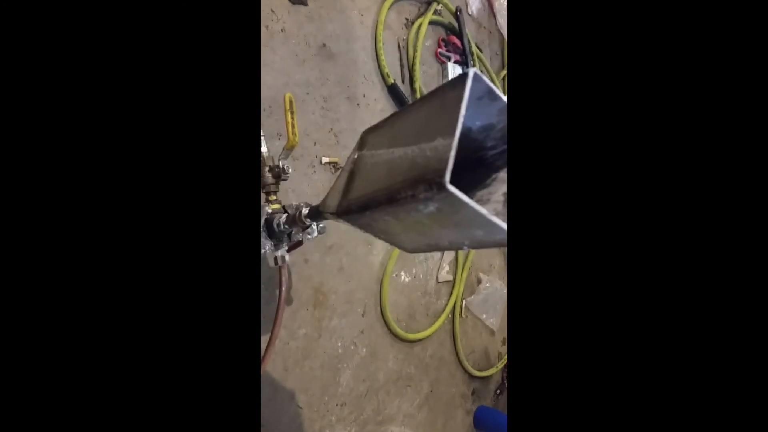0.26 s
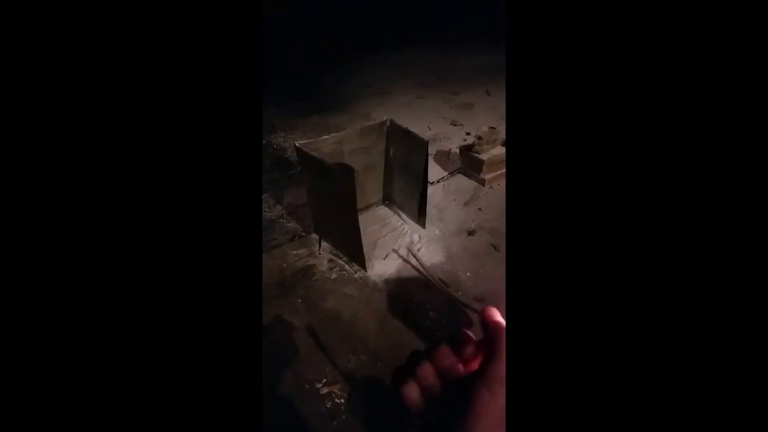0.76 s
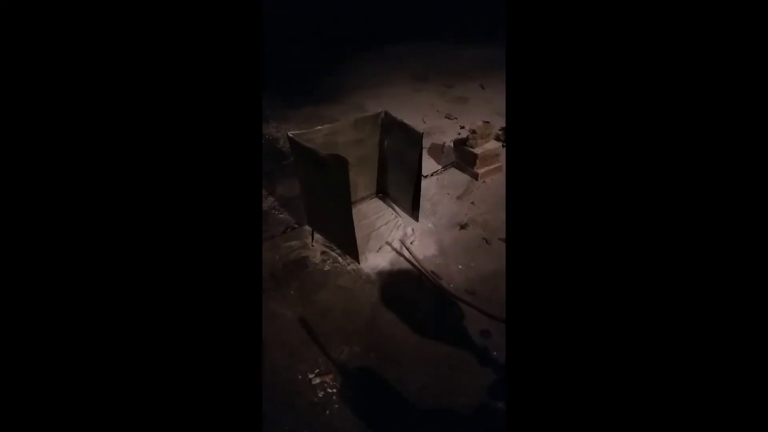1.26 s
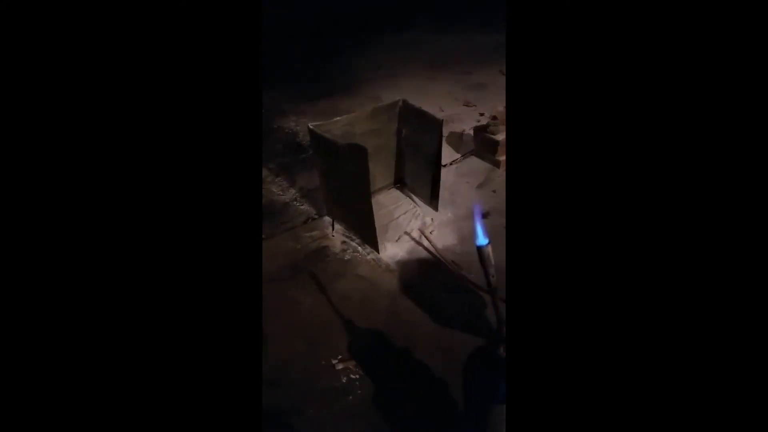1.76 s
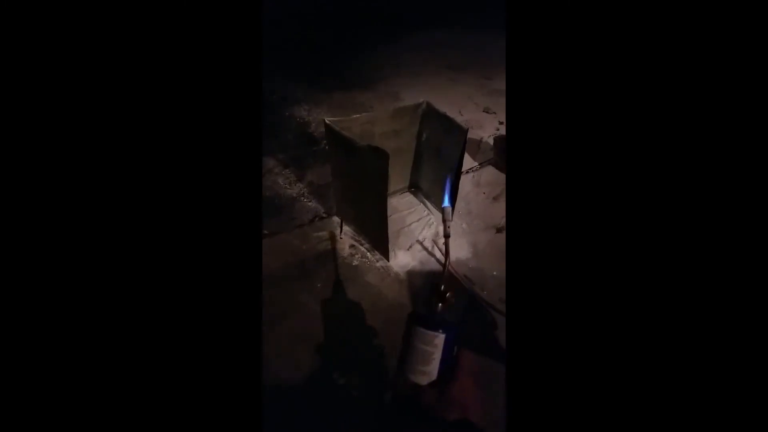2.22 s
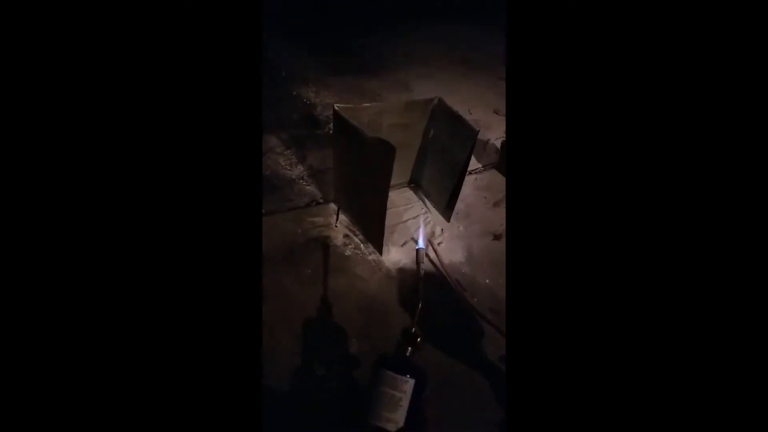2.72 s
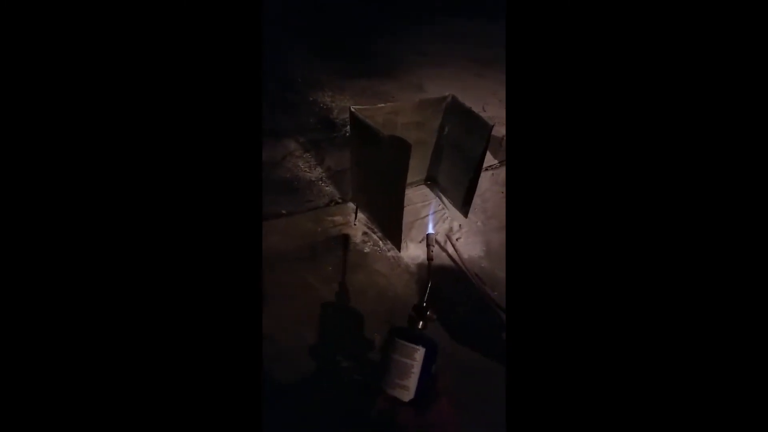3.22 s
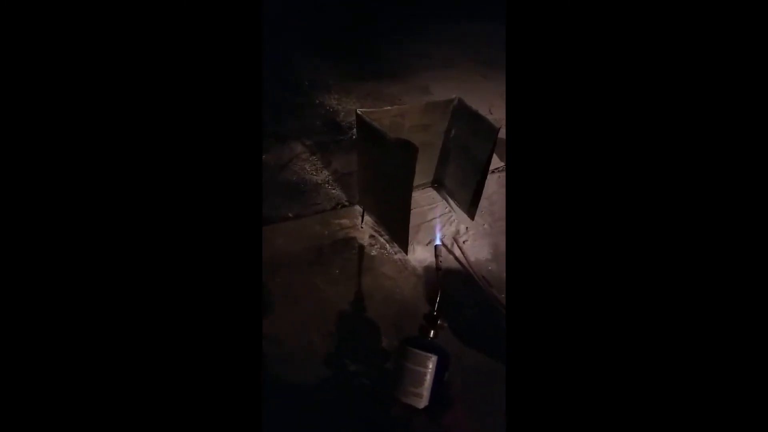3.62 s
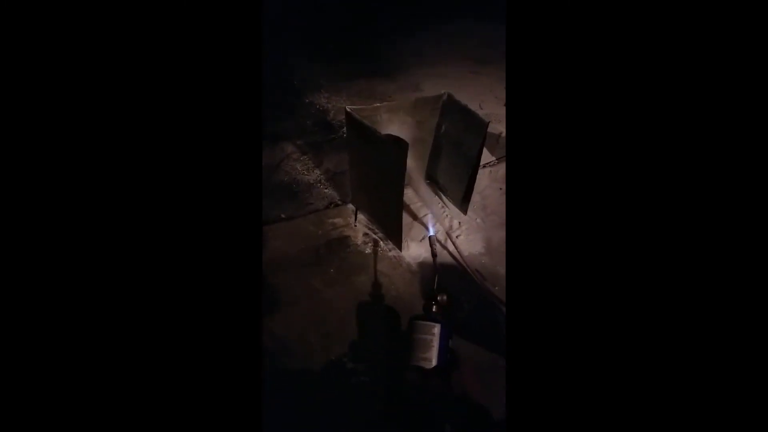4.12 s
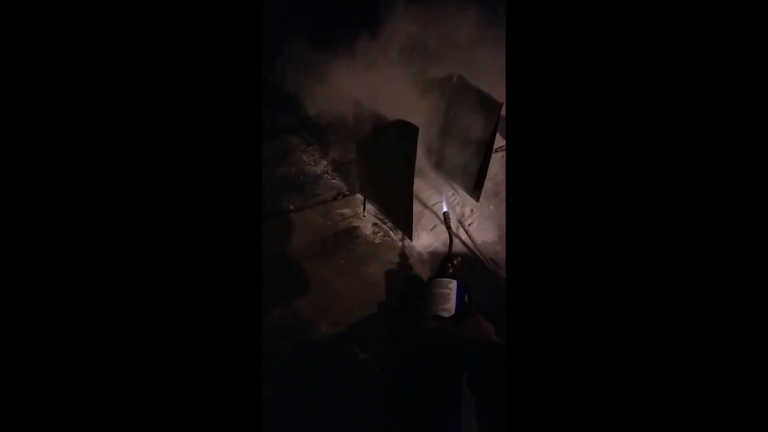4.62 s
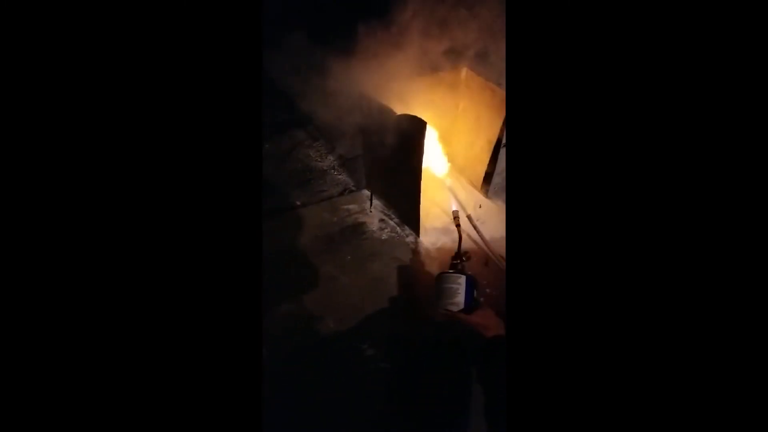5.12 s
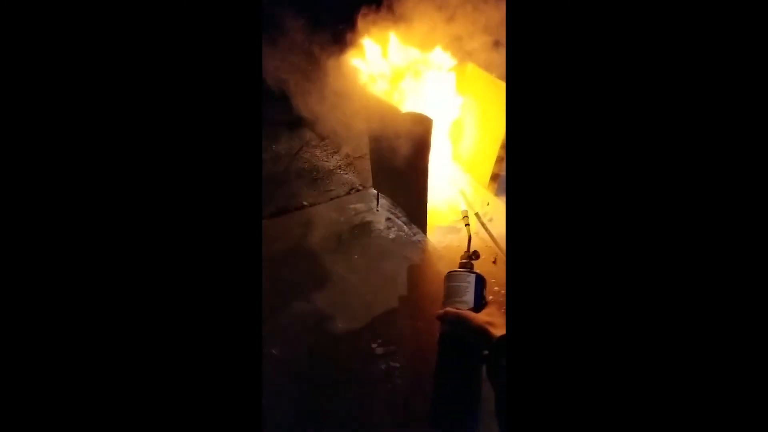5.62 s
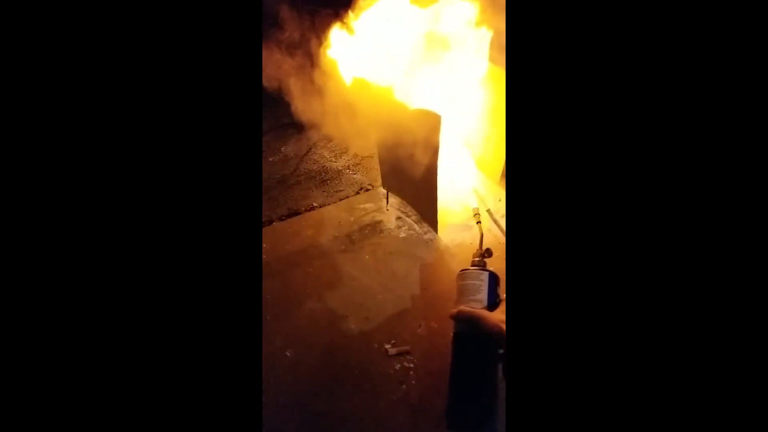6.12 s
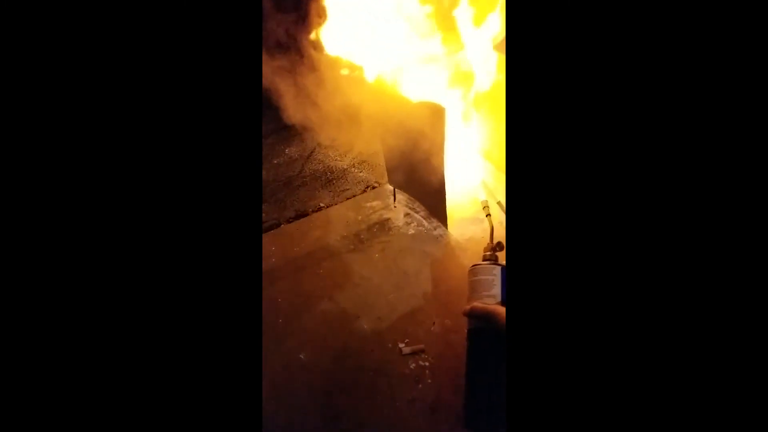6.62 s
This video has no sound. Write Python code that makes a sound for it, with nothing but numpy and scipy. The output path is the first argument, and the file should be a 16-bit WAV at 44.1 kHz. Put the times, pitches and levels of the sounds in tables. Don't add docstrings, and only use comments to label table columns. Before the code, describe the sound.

A torch puffs alight, snaps and roars with a bright air jet near concrete, then cuts to muffled slow-motion fire rumbling and thudding.

```python
import sys
import numpy as np
from scipy import signal
from scipy.fft import rfft, irfft, next_fast_len
from scipy.io import wavfile
from scipy.ndimage import uniform_filter1d

SR = 44100
rng = np.random.default_rng(int(sys.argv[2]) if len(sys.argv) > 2 else 0)


def undo_db(level):
    steps = np.asarray(level, float) / 20
    return 10 ** steps


def unload_audio(sound):
    columns = np.transpose(np.atleast_2d(sound))
    steps = np.round(np.clip(columns, -1, 1) * 32767)
    wavfile.write(sys.argv[1], SR, steps.astype(np.int16))


N = 302746
T = np.arange(N) / SR
HZ = np.fft.rfftfreq(2048, 1 / SR)[:, None]
FRAMES = np.arange(N // 512 + 5) * 512 / SR
EDGE_HZ = 14560


def evened(x):
    return x / np.sqrt(np.mean(abs(x) ** 2) + 1e-30)


def read(points, hz=HZ):
    f, value = np.transpose(points)
    return np.interp(np.log(hz + 1), np.log(f + 1), value)


def column(rows, index, t=T):
    return np.interp(t, *np.array(rows)[:, [0, index]].T)


def bumps(rows, t=T):
    return sum(db * np.exp(-((t - s) / wide_s) ** 2) for s, db, wide_s in rows)


def late(ms):
    return np.exp(-2j * np.pi * HZ * ms / 1000)


def noise(colour, ports, alike_hz, band, patchy_db, flicker_db, alike_high=0):
    a, b, c, d, e, f, patches = rng.standard_normal((len(FRAMES), len(HZ), 7)).T
    patches = uniform_filter1d(patches, size=16, axis=0)
    patches = evened(uniform_filter1d(patches, size=6, axis=1))
    flicker = evened(uniform_filter1d(rng.standard_normal(len(FRAMES)), size=2))
    alike = np.clip(alike_high + (1 - alike_high) / (1 + (HZ / alike_hz) ** 2), 0, 1)
    shared = np.sqrt(alike) * (a + 1j * b) * ports
    separate = np.sqrt(1 - alike) * np.array([c + 1j * d, e + 1j * f]) * abs(ports)
    level_db = read(colour) + patchy_db * patches + flicker_db * flicker
    z = (shared + separate) * undo_db(level_db) * (HZ < EDGE_HZ)
    out = signal.istft(z, nperseg=2048, noverlap=1536)[1]
    hz = np.fft.rfftfreq(out.shape[1], 1 / SR)
    heard = rfft(out.mean(0))[(hz > band[0]) & (hz < band[1])]
    return out[:, :N] * out.shape[1] / np.sqrt(2 * np.sum(abs(heard) ** 2))


def bass(colour, apart, band):
    both, left, right = rng.standard_normal((3, N))
    size = next_fast_len(N, True)
    hz = np.fft.rfftfreq(size, 1 / SR)
    z = rfft(both + apart * np.array([left, right]), size) * undo_db(read(colour, hz))
    heard = irfft(z.mean(0) * (hz > band[0]) * (hz < band[1]), size)
    return irfft(z, size)[:, :N] / np.sqrt(np.mean(heard ** 2))


# frequency in Hz, level in dB per Hz.
HUM_COLOUR = [(8.8, -24), (15, -1), (32, -25), (64, -8), (75, -2), (97, -3), (114, -18), (250, -12.5),
              (300, -23), (800, -39), (1040, -73), (1760, -120)]
HISS_COLOUR = [(240, -40), (400, -3), (676, -11), (797, -8), (2420, -12), (2650, -11.5), (3790, -12),
               (14400, -17)]
RUSTLE_COLOUR = [(300, -17), (500, -4), (1500, -6), (4000, 0), (6000, -4.5), (9000, -10), (14300, -11),
                 (14600, -80)]
HUM_DB, HISS_DB, RUSTLE_HUM_DB, RUSTLE_DB, SETTLE_S = -64.5, -77.5, 8.5, -65, .17


def yard():
    fading = np.exp(-(T / SETTLE_S) ** 2)
    hum = bass(HUM_COLOUR, 0.56, (40, 400)) * undo_db(HUM_DB + RUSTLE_HUM_DB * fading)
    rustle = bass(RUSTLE_COLOUR, 3.1, (2000, 9000)) * undo_db(RUSTLE_DB) * fading
    hiss = noise(HISS_COLOUR, np.ones((2, 1, 1)), 300, (2000, 9000), 1.1, .6) * undo_db(HISS_DB)
    return hum + rustle + hiss


# start in seconds, peak in dB, main frequency in Hz, sign, cycles.
PRESSURE_PUSHES = [
    (.0676, -38, 115, -1, 1.6),
    (.0927, -35, 290, 1, 2.4),
    (5.37, -46, 1100, 1, 25),
    (1.131, -28, 300, -1, 1.5),
    (1.176, -28, 200, 1, 1.2),
    (1.185, -24, 110, -1, 1.5),
]


def pushes():
    out = np.zeros(N)
    for s, db, hz, sign, cycles in PRESSURE_PUSHES:
        u = np.clip((T - s) * hz / cycles, 0, 1)
        out += np.sign(sign) * undo_db(db) * np.sin(2 * np.pi * cycles * u) * np.sin(np.pi * u ** .5)
    return out


# start in seconds, peak in dB, left minus right in dB, index of ringing object.
HARD_CLICKS = [
    (.0674, -31, 0, 2),
    (.0922, -15.5, 0, 0),
    (1.4456, -1, 5, 1),
    (1.4569, -17, -7, 1),
]
# frequency in Hz, level in dB, 60 dB decay in seconds.
OBJECT_RINGS = [
    [(700, -5, .007), (1300, -4, .005), (2100, -2, .004), (3600, -6, .004), (5700, -2, .0045),
     (6800, -7, .004), (8500, -11, .003), (11500, -12, .003), (14000, -13, .003)],
    [(2500, -7, .013), (3600, -10, .004), (4900, -3, .005), (6500, 1, .005), (8700, -5, .004),
     (12500, -10, .003)],
    [(900, 0, .004), (2200, -3, .003), (3500, -6, .003)],
]


def clicks():
    out = np.zeros((2, N))
    t = np.arange(1500) / SR
    for s, db, lean_db, thing in HARD_CLICKS:
        at = round(s * SR)
        hz, ring_db, t60_s = np.transpose(OBJECT_RINGS[thing])[:, :, None]
        for port, side in enumerate((.5, -.5)):
            cycles = hz * t + .2 * rng.random(hz.shape)
            ring = undo_db(ring_db - 60 * t / t60_s) * np.sin(2 * np.pi * cycles)
            onset = np.minimum(t / .0003, 1)
            out[port, at:at + len(t)] += undo_db(db - 5 + side * lean_db) * ring.sum(0) * onset
    return out


# time in seconds, lateness of ground echo in ms.
ECHO_LATENESS = [(.74, 2.6), (2.4, 2.42), (2.75, 1.85), (3.3, 1.38), (3.5, 1.6), (4.3, 1.2), (4.5, 1.0),
                 (4.9, .87), (5.28, .63)]
HIGH_MS, LOW_MS = 2.8, 1.35


def lowered(t):
    return np.clip((HIGH_MS - column(ECHO_LATENESS, index=1, t=t)) / (HIGH_MS - LOW_MS), 0, 1)


# time in seconds, lead of left port in ms.
LEFT_LEAD = [(.74, 0.017), (2.3, 0.048), (2.58, 0.17), (2.95, .16), (3.2, 0.049), (4.4, .06), (4.9, 0.1),
             (5.28, 0.14)]
ECHO_HIGH, ECHO_LOW, RIGHT_ECHO, RIGHT_LEAST_MS = .12, .68, .7, .74
BOX_HIGH, BOX_LOW = .22, .08


def echoed(share_gain, dull_hz):
    lateness_ms = column(ECHO_LATENESS, index=1, t=FRAMES)
    lead_ms = column(LEFT_LEAD, index=1, t=FRAMES)
    share = ECHO_HIGH + (ECHO_LOW - ECHO_HIGH) * lowered(FRAMES)
    share = np.clip(share * share_gain, 0, 1) / (1 + (HZ / dull_hz) ** 2)
    share = share * (1 - 0.316 / (1 + (HZ / 1300) ** 4))
    box = (BOX_HIGH + (BOX_LOW - BOX_HIGH) * lowered(FRAMES)) * late(0.82) / (1 + (HZ / 2500) ** 2)
    left = 1 + share * late(lateness_ms) + box
    right_ms = np.maximum(lateness_ms * 0.868, RIGHT_LEAST_MS)
    right = late(lead_ms) * (1 + RIGHT_ECHO * share * late(right_ms) + box)
    return np.array([left, right])


# frequency in Hz, level in dB per Hz.
JET_COLOUR = [(530, -87), (900, -53.5), (1300, -43), (1870, -9.5), (2360, -16.5), (2500, -16.5),
              (4020, -8.5), (4410, -7), (5500, -6.5), (9160, -5), (14400, -3)]
# frequency in Hz, width in Hz, gain in dB.
PORT_CAVITIES = [
    [(4700, 700, -4), (8800, 1400, -4), (11000, 1400, 4)],
    [(4550, 700, -4), (9300, 1200, -6), (11600, 1200, 2)],
]
PORT_SHIFT = .05
JET_DB, OPEN_S, OPENING_DB_PER_S, JET_SAG_DB_PER_S, JET_FOLLOWS = -38, 1.38, 18, 0.24, 0.71


def air_jet(dips_db):
    since_s = T - OPEN_S
    jet_db = JET_DB + np.minimum(OPENING_DB_PER_S * since_s, -JET_SAG_DB_PER_S * since_s)
    contrast = np.clip(column(ECHO_LATENESS, index=1, t=FRAMES) / LOW_MS, 0, 1)
    shifted_hz = HZ / (1 - PORT_SHIFT * lowered(FRAMES))
    cavity = []
    for port in PORT_CAVITIES:
        port_db = sum(db * np.exp(-((shifted_hz - hz) / wide_hz) ** 2 * 2) for hz, wide_hz, db in port)
        cavity.append(undo_db(contrast * port_db))
    ports = echoed(0.87, 5060) * np.array(cavity)
    jet = noise(JET_COLOUR, ports, 1500, (6000, 14500), 0.55, 0.46, alike_high=0.09)
    return jet * undo_db(jet_db + JET_FOLLOWS * dips_db)


# frequency in Hz, level in dB per Hz.
ROAR_COLOUR = [(88, -33), (150, -12.5), (403, -5), (574, -4), (885, -1.5), (1300, -4), (1910, -5.5),
               (2410, -6), (6000, -14), (7800, -29.5), (13200, -120)]
DULL_HIGH_DB, DULL_LOW_DB = 1.04, 1.03
FACING_HZ, FACING_DB = 1400, 1
LIT_DB, LOWERED_DB = -36, -6.5


def flame_roar(lighting_db, lit, dips_db):
    flame_db = np.where(lit, LIT_DB + LOWERED_DB * lowered(T) + dips_db, lighting_db)
    low = lowered(FRAMES)
    gap = (HZ + 1) * column(ECHO_LATENESS, index=1, t=FRAMES) ** .75 / 1000
    hollow = np.exp(-np.log2(gap) ** 2 / .12)
    dull_db = DULL_HIGH_DB + (DULL_LOW_DB - DULL_HIGH_DB) * low
    turned_db = dull_db * (2.6 * hollow * np.sqrt(low) - np.log2(1 + HZ / 900))
    facing_db = FACING_DB * (1 - low) * np.exp(-np.log2((HZ + 1) / FACING_HZ) ** 2 / .15)
    ports = echoed(0.92, 5200) * undo_db(turned_db + facing_db)
    return noise(ROAR_COLOUR, ports, 2000, (500, 2500), 1.17, .8) * undo_db(flame_db + 0.5)


# frequency in Hz, level in dB per Hz.
FLUTTER_COLOUR = [(8.8, -49), (15, -32.5), (27, -26.5), (59, -3), (113, 4), (150, -5.5), (215, 1),
                  (318, -4), (420, -4.5), (550, -33), (920, -120)]
UNLIT_FLUTTER_DB, FLUTTER_CAP_DB, LIT_FLUTTER_DB, GROUND_FLUTTER_DB = 9.5, -39.5, -46, 4
CAUGHT_S, FLUTTER_FOLLOWS = 1.195, 0.58


def flame_flutter(lighting_db, dips_db):
    near = np.clip(1 - column(ECHO_LATENESS, index=1) / LOW_MS, 0, 1) * 2
    steady_db = LIT_FLUTTER_DB + FLUTTER_FOLLOWS * dips_db + GROUND_FLUTTER_DB * near
    struggling_db = np.minimum(lighting_db + UNLIT_FLUTTER_DB, FLUTTER_CAP_DB)
    flutter_db = np.where(T > CAUGHT_S, steady_db, struggling_db)
    return bass(FLUTTER_COLOUR, 0.64, (40, 420)) * undo_db(uniform_filter1d(flutter_db, size=600) - 3.0)


def thinned(x, under_db, from_hz):
    hz, _, z = signal.stft(x, SR, nperseg=1024, noverlap=512)
    near = uniform_filter1d(uniform_filter1d(abs(z) ** 2, size=5, axis=1), size=2, axis=2)
    mask_db = 2 * under_db - 14 / (1 + (hz[:, None] / 2200) ** 6)
    mask = uniform_filter1d(near, size=120, axis=1) * undo_db(mask_db)
    kept = 1 / (1 + (mask / (near + 1e-20)) ** 8 * (hz[:, None] > from_hz))
    return signal.istft(z * kept, SR, nperseg=1024, noverlap=512)[1][:, :N]


# time in seconds, flame level in dB.
FLAME_LIGHTING = [
    (.76, -74),
    (.81, -75.5),
    (.88, -49),
    (.917, -44.5),
    (.99, -48),
    (1.047, -62),
    (1.131, -45.5),
    (1.193, -38),
    (1.23, -36.5),
]
# time in seconds, depth in dB, width in seconds.
FLAME_GUTTERS = [
    (2.48, -2, 0.074),
    (2.66, -2, 0.094),
    (2.91, -3, 0.05),
]
LEAN_DB, LEAN_DB_PER_MS = 1.96, 14


def torch():
    lit = T > FLAME_LIGHTING[-1][0]
    lighting_db, dips_db = column(FLAME_LIGHTING, index=1), bumps(FLAME_GUTTERS)
    lean_db = LEAN_DB + LEAN_DB_PER_MS * column(LEFT_LEAD, index=1)
    leaning = flame_roar(lighting_db, lit, dips_db) + air_jet(dips_db)
    leaning = leaning * undo_db(lean_db * np.array([[.5], [-.5]]))
    return thinned(leaning + flame_flutter(lighting_db, dips_db), -4.6, 450)


# frequency in Hz, level in dB per Hz.
RUMBLE_COLOUR = [(7.1, -44), (12, -3.5), (27, 0.5), (43, 2), (62, -3.5), (92, -28.5), (108, -31.5),
                 (130, -27.5), (170, -56.5), (290, -120)]
BREEZE_DB = -70.5


def draught():
    return bass(RUMBLE_COLOUR, 0.34, (15, 90)) * undo_db(BREEZE_DB + 5.3 * lowered(T))


# frequency in Hz, level in dB per Hz.
WASH_COLOUR = [(59, -52), (100, -5.5), (162, -1.5), (243, -4.5), (332, -12.5), (423, -8.5), (471, -16.5),
               (624, -10), (734, -15), (785, -9.5), (1180, -14), (1350, -4), (1580, -13.5), (1860, -11),
               (2500, -17), (3250, -46), (5500, -120)]
# frequency in Hz, left minus right in dB.
WASH_BALANCE = [(60, -10.5), (150, 3), (380, 6), (950, 7), (2380, 13), (5980, 13.5), (15000, -2.0)]
# time in seconds, peak in dB, main frequency in Hz.
DUST_FLARES = [
    (6.56, -36, 30),
    (6.601, -28.5, 32),
    (6.641, -37, 36),
    (6.701, -31, 42),
    (6.73, -37, 36),
    (6.762, -29.5, 36),
    (6.838, -34, 55),
]
# time in seconds, depth in dB, width in seconds.
RUMBLE_LULL = (5.468, -3.5, .04)
WASH_DB, RUMBLE_DB, WASH_GAIN_DB, RUMBLE_GAIN_DB = -51.5, -53, 3.5, 12.5
GROW_FROM_S, GROWN_S, SLOW_EDGE_HZ, RESIDUE_DB = 6.24, 6.65, 2520, -95


def fireball():
    size = np.clip((T - GROW_FROM_S) / (GROWN_S - GROW_FROM_S), 0, 1)
    grit = undo_db(RESIDUE_DB) * rng.standard_normal((2, N))
    lean = undo_db(read(WASH_BALANCE) * np.array([.5, -.5])[:, None, None])
    ground = np.array([1 + 0.21 * late(4.2), 1 + 0.11 * late(3.2)])
    ports = lean * (HZ < SLOW_EDGE_HZ) * ground
    wash = noise(WASH_COLOUR, ports, 130, (300, 2500), 1.0, 0.78) * undo_db(WASH_DB + WASH_GAIN_DB * size)
    flashes = np.zeros(N)
    for s, db, hz in DUST_FLARES:
        u = np.pi * hz * (T - s)
        flashes += undo_db(db) * (1 - 2 * u ** 2) * np.exp(-u ** 2)
    rumble_db = RUMBLE_DB + RUMBLE_GAIN_DB * size + bumps([RUMBLE_LULL])
    return wash + flashes + grit + bass(RUMBLE_COLOUR, 0.69, (15, 90)) * undo_db(rumble_db)


# time in seconds, fade in dB.
SCENE_FADES = [
    [(0, 0), (.675, 0), (.69, -14), (.715, -45)],
    [(.735, -60), (.745, -17), (.755, -4), (.765, 0), (5.268, 0), (5.275, -8), (5.33, -46), (5.36, -66)],
    [(5.262, -30), (5.275, 0), (6.855, 0), (6.866, -12)],
]


def scene():
    taps = pushes() + clicks()
    parts = yard(), torch() + draught(), fireball()
    fades = [undo_db(np.interp(T, *np.transpose(rows), -140, -140)) for rows in SCENE_FADES]
    return sum(part * fade for part, fade in zip(parts, fades)) + taps


def top_cut(x):
    return signal.sosfilt(signal.butter(12, 15890, fs=SR, output="sos"), x)


def record(dry):
    return top_cut(dry)


dry = scene()
out = record(dry)
unload_audio(out)
```